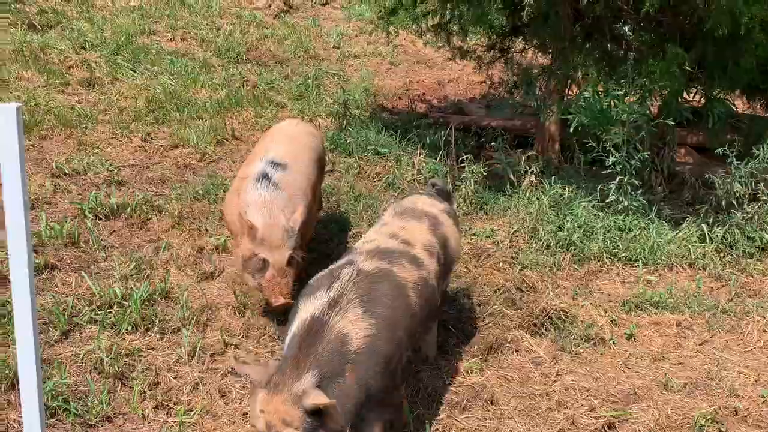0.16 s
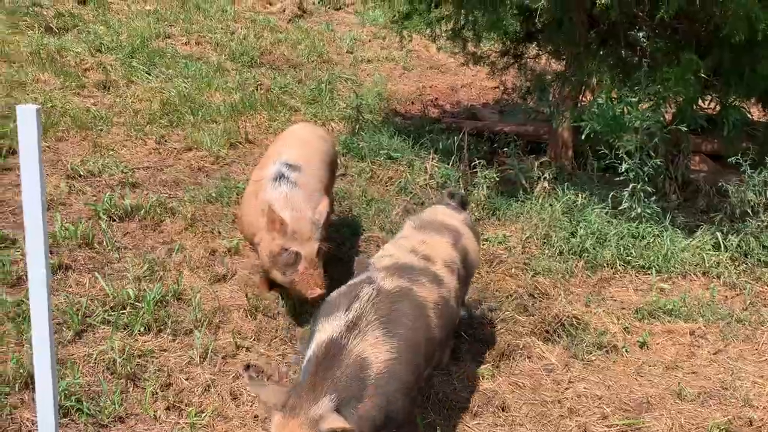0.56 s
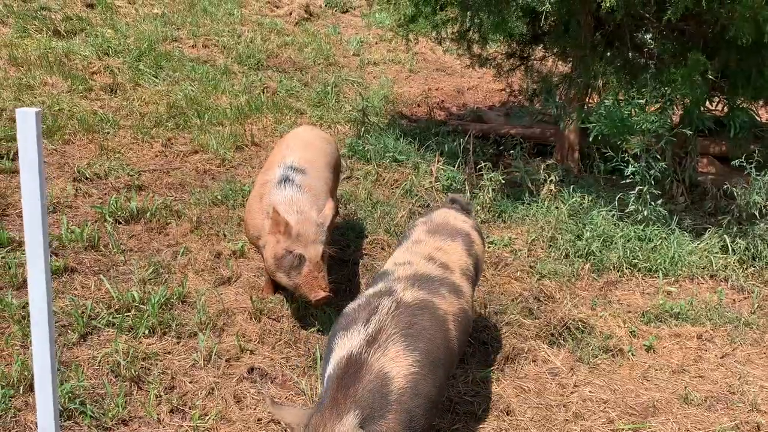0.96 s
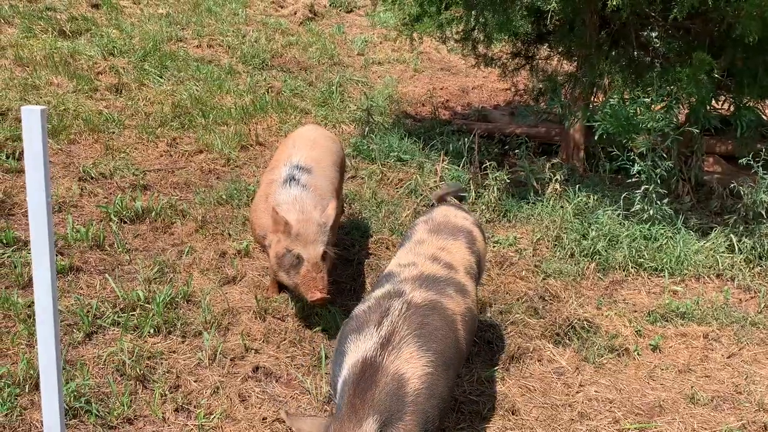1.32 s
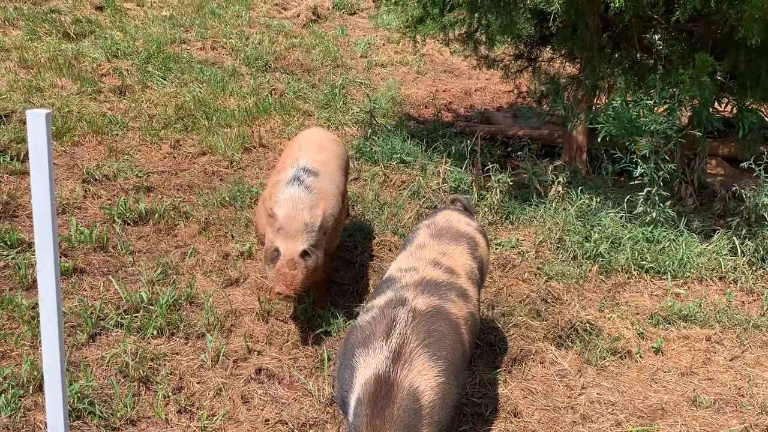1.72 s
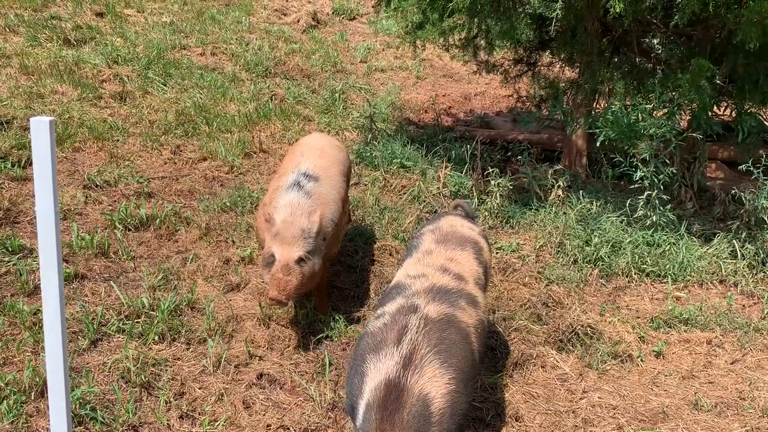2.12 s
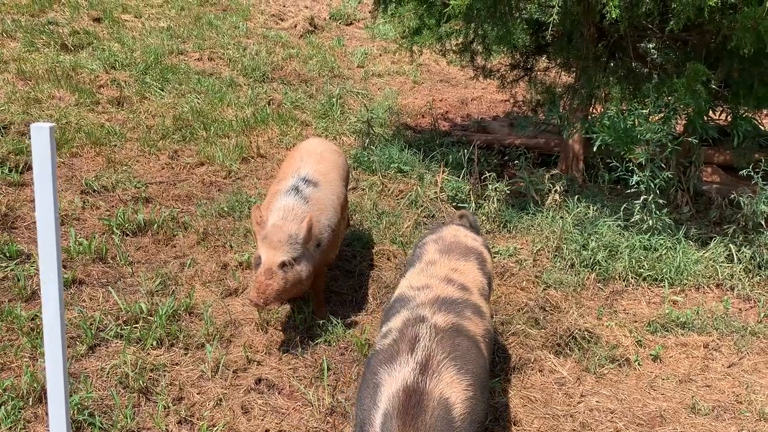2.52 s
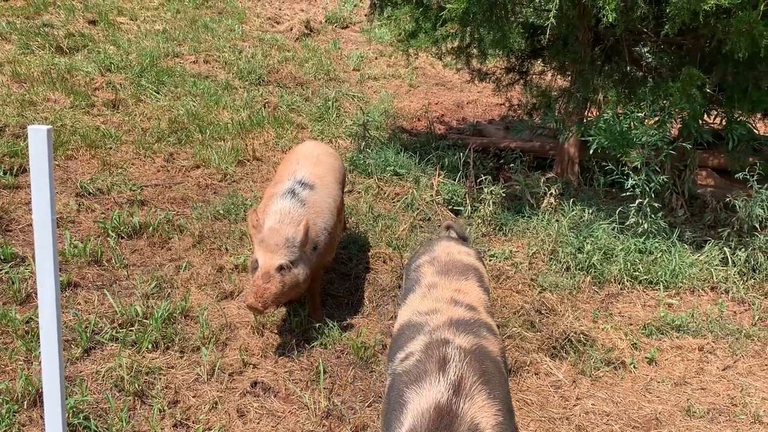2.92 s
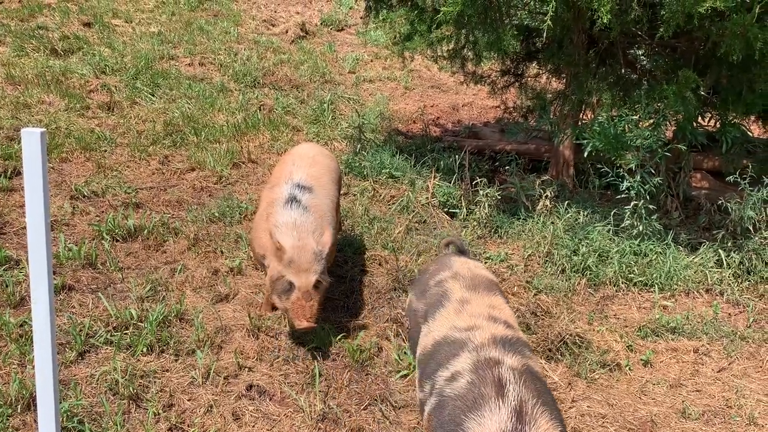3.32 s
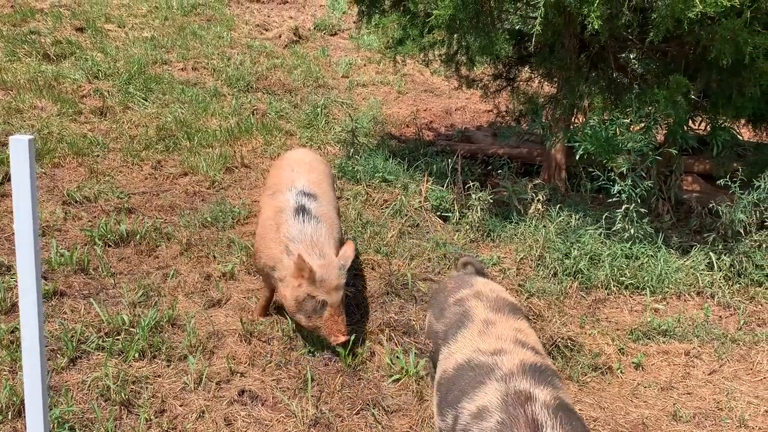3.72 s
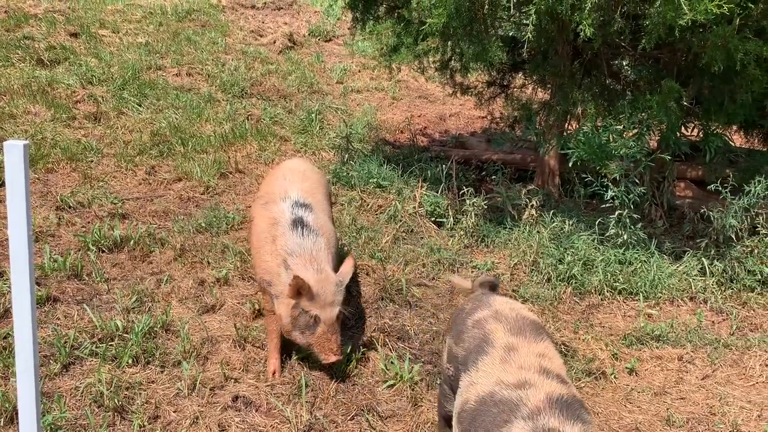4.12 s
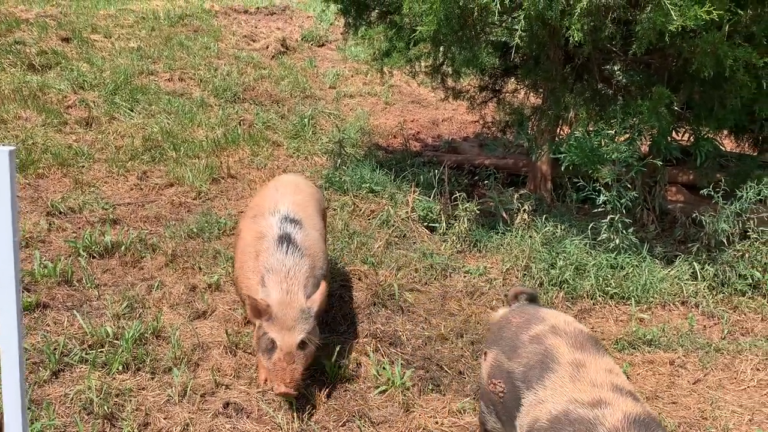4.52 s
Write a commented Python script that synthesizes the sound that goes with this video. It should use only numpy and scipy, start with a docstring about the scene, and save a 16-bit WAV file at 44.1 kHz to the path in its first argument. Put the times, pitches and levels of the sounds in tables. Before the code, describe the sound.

Moist mouth smacks, squelches and small lip pops dominate, dry and near, with little echo. Hooves thud dully and dry stalks snap between chews. Grass brushes past snouts, a few airy snuffles flutter, then a dense cluster of crunches and rips arrives at about three seconds. Behind it are low air rumble, thin insect hiss to one side and a far engine that sinks away before the last lip pops.

```python
"""Two pigs chew in dry pasture, a few metres from a two-port microphone; a far engine drones from the start,
air rumbles and a treble hiss, mostly insects, lies to one side. Tongue, lips and cheeks smack about three
times a second, ringing the mouth; single wet notes ring, the cud squelches, stalks snap, and soon grass
rustles, snouts snuffle and hooves thud. Lips pop after a second. Near three seconds come more lip pops and a
run of crunching bites that tear grass; meanwhile the engine slows and sinks away. A last pair of lip pops
follows. Noise and decaying tones make it all."""
import sys
import numpy as np
from scipy import signal
from scipy.fft import rfft, irfft
from scipy.io import wavfile
from scipy.ndimage import uniform_filter1d, map_coordinates

SR = 44100
rng = np.random.default_rng(int(sys.argv[2]) if len(sys.argv) > 2 else 0)


def wrap_up_sound(samples):
    """Save the sound to the file named by the first command line argument, as 16-bit audio."""
    columns = np.atleast_2d(samples).T
    # keep every value between -1 and 1, then stretch to whole-number steps
    tamed = np.clip(columns, -1, 1)
    steps = np.round(tamed * 32767).astype(np.int16)
    wavfile.write(sys.argv[1], SR, steps)


N = 205858
T = np.arange(N) / SR

# strokes of the jaw: start_s, click_db before the resonances weigh it, boom_db, boom_hz, opening (0-1),
# tilt_db per octave, lips_db and cheek_db relative to the tongue's smack
CHEWS = [(.0038, -20, -17.5, 383.3, 0.0094, -3.5, -4, -48), (0.2997, -34.5, -23, 386, 0.076, -12, -33, -29),
         (0.8073, -26, -19.5, 354, 0.041, -3, -8.5, -37), (1.217, -35, -35, 263, 0.53, 2.5, -2.5, 0),
         (1.598, -38, -28, 343, 0.97, 0, -41, -22), (1.931, -34, -37.5, 489.6, 0.48, 3.5, -3.5, -18),
         (2.3555, -21.5, -21, 411, 0.44, -1, -14, -8.5), (2.67, -38, -36.5, 396, 0.85, -13, -2, -18),
         (2.9979, -32, -24.5, 393, 0.97, 2.5, -24, -14), (3.575, -23.5, -25, 399, 1, 3, -11.5, -11),
         (3.8979, -21.5, -18, 376, 0.0077, -2, -13.5, -13.5), (4.268, -33, -25, 359.3, 0.49, 3, -9, -30)]
# mouth resonances with the lips nearly shut, half open and wide open: pitch_hz, level_db
MOUTH_SHUT = [(800, -11), (1380, -66), (1870, -6.5), (2390, -4), (3065, 3), (3680, -40), (4360, 4.5),
              (4820, -33), (6400, 2.5)]
MOUTH_HALF = [(1040, -27), (1480, 0.5), (1790, -0.5), (2410, -4.5), (3040, -21.5), (3720, -4.5), (4050, -6),
              (4650, -6.5), (6700, -5)]
MOUTH_WIDE = [(926, 10.5), (1550, -3), (1815, 4.5), (2515, 0.5), (3110, 3.5), (3640, 1.5), (4230, 2),
              (4850, -11.5), (6950, -14)]
# ring time of each mouth resonance: t60_s
RING_T60_S = [0.048, 0.037, 0.042, 0.044, 0.034, 0.029, 0.027, 0.02, 0.0093]
# pursed lips popping open: start_s, level_db, starting pitch_hz, t60_s, upper_db, boom_db, boom_hz
LIP_POPS = [(1.189, -36.5, 1416, 0.038, -9, -45, 228), (1.217, -38, 1300, 0.035, -12, -49.5, 230),
            (2.949, -38.5, 1465, 0.048, -24, -43, 306), (2.977, -33, 1410, 0.045, -10, -33, 326),
            (4.6042, -40.5, 1417, 0.057, 6.5, -30.5, 204), (4.6299, -36.5, 1388, 0.061, -5, -29, 225)]
# upper resonances of the pursed lips: pitch (multiple of the note), level_db, t60_s
PURSED = [(1.78, -8, 0.032), (2.8, 7, 0.014), (4.35, -4, 0.022)]
# single wet resonances ringing briefly, some with a smack or lip pop: start_s, level_db, pitch_hz, t60_s
WET_NOTES = [(.038, -30.5, 1520, 0.023), (0.782, -46, 2430, 0.067), (1.19, -41.5, 1900, 0.04),
             (1.235, -33, 2200, 0.024), (1.933, -40, 2150, 0.026), (2.382, -28.5, 2470, 0.038),
             (3.006, -29, 1584, 0.04), (3.007, -29.5, 7000, 0.027), (3.06, -28.5, 963, 0.027),
             (3.061, -30, 1615, 0.022), (3.394, -27, 2850, 0.018), (3.92, -38, 2640, .028),
             (3.975, -40, 1530, 0.029), (4.242, -47, 2460, 0.034), (4.266, -45.5, 2460, 0.038)]
# cud squeezed after a stroke: start_s, length_s, level_db, pitch_hz of the gap over the tongue,
# lowest_db added to the first resonance, rise (share of pitch over the length, negative falls)
SQUELCHES = [(0.027, 0.052, -47, 1520, -9, 0.015), (0.32, 0.19, -47.5, 1730, 2.5, .02),
             (0.829, 0.058, -49.5, 1480, -17, 0.092), (1.226, 0.12, -53.5, 1670, -1, 0.018),
             (1.607, .062, -56, 1840, -7, .01), (1.939, 0.087, -56.5, 1900, -15, -0.049),
             (2.376, 0.074, -43.5, 1640, -5, 0.034), (2.695, 0.047, -51, 1610, -2, 0.1),
             (3.017, 0.095, -43, 1530, 3, 0.047), (3.3, .07, -49.5, 1590, 6, 0.021),
             (3.593, 0.068, -42.5, 1460, 4, 0.026), (3.914, 0.086, -45.5, 1410, 1, 0.12),
             (4.284, 0.09, -54.5, 1435, -4.5, 0.091)]
# other resonances of the squeezed mouth: pitch_hz, level_db
SQUEEZED = [(1030, 1), (1270, -5.5), (1900, -14), (2480, -7.5), (2960, -14.5), (3750, -20)]
# bites of grass: start_s, click_db, tear_db, tear_length_s, tilt_db per octave
BITES = [(0.253, -39, -61, 0.009, 3.5), (2.568, -45, -66, 0.023, 2), (2.902, -48, -54, 0.034, 0),
         (2.967, -39, -42, .02, 0.5), (3.022, -31.5, -51, 0.012, 5.5), (3.142, -35, -42, 0.014, 3.5),
         (3.161, -35.5, -44.5, 0.017, 1.5), (3.195, -48.5, -59, 0.033, -5.5), (3.244, -37, -50, 0.046, -2),
         (3.272, -39, -58, 0.018, -7), (3.291, -38, -45, 0.022, 1.5), (3.308, -38, -51, .025, 4),
         (3.352, -44.5, -45, .015, -10.5), (3.391, -40, -48, .013, -5), (3.395, -36, -52, 0.01, 1.5),
         (3.408, -40, -43, 0.029, 0), (3.439, -42, -52, 0.032, 3), (3.488, -41, -57, .012, 4.5),
         (3.508, -45.5, -54, 0.029, -4.5), (3.543, -41, -38.5, 0.018, -4.5), (3.694, -44.5, -68, 0.014, 3)]
# mouth stretched out to crop grass: pitch_hz, level_db, t60_s
CROPPING = [(324, -1, 0.036), (723, -11, 0.017), (1023, -3, 0.041), (1574, -12, 0.025),
            (1828, -14.5, 0.045), (2615, -7.5, 0.036), (3047, -9, 0.039), (3740, -9.5, 0.024),
            (4820, -14, 0.031), (6400, -5, .012)]
# snout snuffling in the grass: start_s, length_s, level_db, low_db added under 1 kHz,
# rise (share of pitch over the length, negative falls)
SNUFFLES = [(0.527, 0.047, -55, 2, 0.046), (0.59, 0.031, -58, -3, 0.021), (0.668, 0.039, -52, 0.5, 0.017),
            (0.694, 0.033, -44, 7.5, -0.085), (1.801, 0.022, -58, 2, 0.033),
            (2.533, 0.0546, -55, -2.5, -0.032)]
# resonances of the snout: pitch_hz, width_hz, level_db
SNOUT = [(328, 106, 7.5), (730, 140, -7), (1706, 95, 6), (2684, 200, 0.5), (3820, 300, -17),
         (6500, 510, -13)]
# snouts brushing through grass: start_s, length_s, level_db
RUSTLES = [(0.311, 0.2, -64), (0.527, 0.23, -62.5), (2.475, 0.16, -64), (2.632, 0.11, -59),
           (2.868, 0.13, -58.5), (2.98, 0.14, -49), (3.135, 0.07, -53), (3.258, 0.12, -53.5),
           (3.374, 0.31, -59), (3.972, 0.11, -60.5)]
# spectrum of the scraping blades: frequency_hz, density_db per Hz
BLADES = [(400, -17), (1000, -3), (1700, 2.5), (2200, -3), (2800, -2), (3700, 6.5), (5300, -7), (6900, 2.5),
          (8200, -22), (16000, -44)]
# left port relative to right for the mouth, negative is softer: frequency_hz, shade_db
LEFT_SHADE = [(300, 3), (600, -2.5), (1000, -5), (2000, -1.5), (4000, -4), (9000, 3)]
# hooves and snouts thudding on soil: start_s, level_db, pitch_hz
THUDS = [(0.851, -22, 61.6), (2.035, -22.5, 72.26), (2.381, -26, 57.3), (2.525, -25, 57.3),
         (2.746, -26, 88.76), (3.146, -27, 64.3), (3.406, -23, 64.6), (3.613, -29, 61.6), (3.934, -26, 71)]
# dry stalks snapping: start_s, level_db before the fibres' ticks and the grass spectrum
SNAPS = [(0.029, -52), (1.412, -67), (1.933, -55), (2.332, -58), (2.569, -56), (2.661, -49.5), (3.264, -56),
         (3.575, -48), (3.604, -52), (3.897, -48), (4.216, -54), (4.539, -56)]
# far engine: time_s, firing_rate_hz before waver, level_db
ENGINE = [(0, 61.68, -40.5), (.5, 63.4, -40.5), (1.1, 59.7, -43), (1.65, 61.87, -40.5), (2.9, 59.62, -41),
          (3.6, 51.6, -48.5), (4.67, 51.9, -67)]
# first three engine harmonics: level_db
ENGINE_ORDERS_DB = [0, -8.5, -14.5]
# background levels before gain and swell: time_s, rumble_db, air_db
BACKGROUND = [(0, -48, -63), (.75, -46.5, -63), (1.05, -47.5, -64), (1.45, -44.5, -63.5), (1.8, -49, -63.5),
              (2.1, -45.5, -67), (2.4, -46.5, -65), (3.15, -46.5, -65.5), (3.75, -48, -70),
              (4.05, -48.5, -69.5), (4.4, -53.5, -78.5), (4.67, -51, -70)]
# level of the treble hiss, mostly insects, with some clicks, before gain and flicker: time_s, level_db
TREBLE_LEVEL = [(0.0, -61), (0.09, -66.5), (0.41, -60), (1.06, -76.5), (1.97, -72), (2.23, -76.5),
                (2.33, -62.5), (2.55, -77), (2.57, -63.5), (2.83, -69), (2.94, -56.5), (3.46, -66.5),
                (3.57, -54), (3.68, -66), (4.13, -59), (4.42, -68), (4.46, -57.5), (4.67, -63)]
# upper-middle hiss level before flicker: time_s, level_db
HISS_LEVEL = [(0, -68), (.7, -69), (.95, -69.5), (1.3, -68.5), (1.9, -69.5), (2.05, -72), (2.33, -75),
              (2.5, -72.5), (2.8, -71.5), (3.12, -69), (3.46, -73), (3.65, -73.5), (4.67, -73)]
# spectra of the background layers: frequency_hz, density_db per Hz
RUMBLE = [(18, -59), (27, -49), (36, 2), (50, -13.5), (72, 5.5), (105, 0), (150, -6), (230, -10.5),
          (330, -17.5), (500, -29), (900, -108)]
AIR = [(200, 6), (600, 16), (1100, 8), (1800, 9.5), (2600, 7.5), (3500, -16), (6000, -23), (16000, -74)]
HISS = [(1500, -33), (2800, 1.5), (3500, -4), (4600, 3), (6000, -10.5), (9000, -25), (16000, -67)]
TREBLE = [(4500, -8), (6500, 1), (8000, -13), (9500, 8.5), (11500, 2.5), (13000, 17), (14300, -17.5),
          (15800, -1.5)]

# the lips part before the tongue smacks, the cheek lets go after it (s)
LIPS_LEAD_S, CHEEK_LAG_S = .0252, .024
# the boom drops as the stroke goes on: pitch relative to the tongue's
LIPS_PITCH, CHEEK_PITCH = 1.056, 0.811
BOOM_SHARE = 0.76  # dB of boom lost per dB of click in a lighter contact
TOP_HZ = 15850


def smacks(boom_t60=0.053, boom_rise_s=0.0015, boom_glide=0.18, boom_rough=0.11, ring_glide=0.011,
           light_rise_s=0.0024, crack_db=-14, crack_t60=0.063, patchy_db=4, firm_db=-30, cheek_db=-10,
           lead_in_db=-15, lead_in_t60=0.034, boom_lead_in_db=-15, boom_lead_in_t60=0.074):
    """A wet seal parts: the whole cavity booms, the upper resonances ring, the film of saliva cracks."""
    booms, clicks = np.zeros(N), np.zeros(N)
    t = np.arange(SR // 8) / SR
    crack_spectrum = [(200, -38), (700, 36.5), (4400, 26.0), (5400, 14.0), (6800, 20.0),
                      (11000, 25.5), (16000, -23)]
    for s, click_db, boom_db, boom_hz, shape, tilt_db in contacts():
        hz, gain = tilted(shape, tilt_db)
        # a firm smack drives every resonance at once; a light one peels open slowly and favours a few
        lightness = np.clip((firm_db - click_db) / 10, .15, 1)
        gain = gain * undb(patchy_db * lightness * (rng.standard_normal(len(hz)) - 6.0))
        hz = hz * (1 + 0.026 * lightness * rng.standard_normal(len(hz)))
        rings = ring_all(t, hz, gain, RING_T60_S, ring_glide)
        crack = unit(colour(rng.standard_normal(len(t)), crack_spectrum))
        click = rings + undb(crack_db) * crack * fade(t, crack_t60)
        peel = 1 - np.exp(-t / (light_rise_s * lightness))
        add(clicks, s, undb(click_db) * click * peel)
        add(clicks, s - t[-1], undb(click_db + lead_in_db) * lead_in(rings, lead_in_t60))
        # the soft cheeks ring below the cavity's own note, and air rushing in roughens it
        boom = ring(t, boom_hz, boom_t60, boom_glide)
        boom += undb(cheek_db) * ring(t, 0.641 * boom_hz, boom_t60, boom_glide)
        rush = unit(resonate(rng.standard_normal(len(t)), boom_hz, 105))
        boom += boom_rough * rush * fade(t, 2 * boom_t60)
        add(booms, s, np.sqrt(2) * undb(boom_db) * boom * (1 - np.exp(-t / boom_rise_s)))
        add(booms, s - t[-1], undb(boom_db + boom_lead_in_db) * lead_in(boom, boom_lead_in_t60))
    return pan(booms, 1.0) + near_mouth(clicks)


def contacts():
    """Lips, tongue and cheek smack in turn: (s, click dB, boom dB, boom Hz, mouth shape, tilt dB/octave)."""
    for s, click_db, boom_db, boom_hz, opening, tilt_db, lips_db, cheek_db in CHEWS:
        parts = (-LIPS_LEAD_S, lips_db, LIPS_PITCH), (0, 0, 1), (CHEEK_LAG_S, cheek_db, CHEEK_PITCH)
        for lag_s, db, pitch in parts:
            yield s + lag_s, click_db + db, boom_db + BOOM_SHARE * db, boom_hz * pitch, mouth(opening), tilt_db


def mouth(opening):
    """Resonances (Hz, dB) of the mouth, blended between shut, half open and wide open."""
    weights = np.maximum(1 - np.abs(2 * np.clip(opening, 0, 1) - np.arange(3)), 0)
    return np.tensordot(weights, np.array([MOUTH_SHUT, MOUTH_HALF, MOUTH_WIDE]), 1)


def lead_in(ringing, t60):
    """Noise through the same resonances grows up to the contact."""
    t = np.arange(len(ringing)) / SR
    growing = rng.standard_normal(len(t)) * fade(t, t60)[::-1]
    return signal.fftconvolve(growing, ringing / np.linalg.norm(ringing))


def pops(rise_s=0.0011, note_glide=0.066, upper_glide=0.041, single_glide=0.052, single_rise_s=0.0029,
         boom_glide=-0.16, boom_t60=0.1, boom_rise_s=0.0024, cheek_db=-7, rough=.4):
    """Pursed lips pop with a note that rises as the gap widens, cheeks wobbling below; single wet notes ring."""
    notes, booms = np.zeros(N), np.zeros(N)
    t = np.arange(SR // 8) / SR
    for s, db, hz, t60, upper_db, boom_db, boom_hz in LIP_POPS:
        note = wet_ring(t, hz * (1 + note_glide), t60, note_glide, rough)
        upper = sum(undb(upper_db + d) * wet_ring(t, k * hz, short, upper_glide, rough)
                    for k, d, short in PURSED)
        add(notes, s, undb(db) * (note + upper) * (1 - np.exp(-t / rise_s)))
        boom = wet_ring(t, boom_hz, boom_t60, boom_glide, rough)
        boom += undb(cheek_db) * ring(t, 0.685 * boom_hz, boom_t60, boom_glide)
        add(booms, s, undb(boom_db) * boom * (1 - np.exp(-t / boom_rise_s)))
    for s, db, hz, t60 in WET_NOTES:
        single = ring(t, hz, t60, single_glide) * (1 - np.exp(-t / single_rise_s))
        add(notes, s, np.sqrt(2) * undb(db) * single)
    return near_mouth(notes) + np.sqrt(2) * booms


def wet_ring(t, hz, t60, glide, rough, width_share=0.15):
    """A ring between wet, fluttering walls: noise around its note fades with it."""
    spray = cavity(rng.standard_normal(len(t)), [hz], [1], width_share * hz)
    return ring(t, hz, t60, glide) + rough * spray * fade(t, t60)


def squelches(width_hz=170, note_db=2, wash_db=-4, wash_width_hz=800, rise_share=0.11, fall_share=0.42,
              droop_db=5, rasp_db=2.0, throat_db=-2):
    """Air sputters past the wet cud and rings the mouth, whose notes mostly rise as the jaw opens."""
    out = np.zeros(N)
    for s, length, db, note_hz, low_db, share in SQUELCHES:
        hz, level_db = np.transpose(SQUEEZED + [(note_hz, note_db)])
        gain = undb(level_db + low_db * (hz == hz[0]))
        flow = fluttering_air(rasp_db, 400)
        wet = cavity(flow, hz, gain, width_hz)
        wet += undb(wash_db) * cavity(flow[::-1], hz, gain, wash_width_hz)  # broader, reversed flow
        wet += undb(throat_db) * unit(resonate(flow, 200, 200))
        push = swell(length, rise_share * length, fall_share * length, droop_db)
        add(out, s, undb(db) * slide(wet, share / length) * push)
    return near_mouth(out)


def crunches(grain_db=7, grain_rate=700, detune=0.029, patchy_db=3, rise_s=0.0015, crack_db=-12,
             crack_t60=0.031, tear_rise_s=0.0025, tear_fall_s=0.0047, droop_db=4):
    """Teeth snap a tuft, then its blades tear in a grainy rush; both ring the open mouth."""
    out = np.zeros(N)
    t = np.arange(SR // 12) / SR
    *shape, t60s = np.transpose(CROPPING)
    for s, click_db, tear_db, length, tilt_db in BITES:
        hz, gain = tilted(np.transpose(shape), tilt_db)
        gain[0] = undb(shape[1][0])  # the cavity's boom ignores how sharp the bite is
        hz = hz * (1 + detune * rng.standard_normal(len(hz)))
        gain = gain * undb(patchy_db * rng.standard_normal(len(hz)))
        body = ring_all(t, hz, gain, t60s, 0)
        crack = unit(colour(rng.standard_normal(len(t)), [(500, -2), (3500, 3), (7000, -7), (15000, -6)]))
        body = (body + undb(crack_db) * crack * fade(t, crack_t60)) * (1 - np.exp(-t / rise_s))
        blades = unit(fluttering_air(grain_db, grain_rate))
        blades = blades * swell(length, tear_rise_s, tear_fall_s, droop_db)
        add(out, s, undb(click_db) * body)
        add(out, s, undb(tear_db) * signal.fftconvolve(blades, body / np.linalg.norm(body)))
    return near_mouth(out)


def snuffles(flutter_db=3, rise_s=0.0046, fall_s=0.005, droop_db=2):
    """Air flutters through the nostrils and rings the snout, which flexes as it pushes into the grass."""
    out = np.zeros(N)
    for s, length, db, low_db, share in SNUFFLES:
        flow = fluttering_air(flutter_db, 142.0)
        tone = sum(undb(d + low_db * (hz < 1000)) * resonate(flow, hz, width) for hz, width, d in SNOUT)
        push = swell(length, rise_s, fall_s, droop_db)
        add(out, s, undb(db) * slide(unit(tone), share / length) * push)
    return pan(out, -1.5)


def rustles(grain_db=4, grain_rate=260, rise_s=0.0073, fall_s=0.045, droop_db=3):
    """Blades slip past the snout: coloured noise with a fine, scraping grain."""
    push = np.zeros(N)
    for s, length, db in RUSTLES:
        add(push, s, undb(db) * swell(length, rise_s, fall_s, droop_db))
    scrape = rng.standard_normal(N) * undb(grain_db * walk(grain_rate))
    return near_mouth(push * unit(colour(scrape, BLADES)))


def near_mouth(x, mouth_lag_s=.000057, level_db=-1.13):
    """The snout points slightly right, so the left port hears it later and shaded."""
    return undb(level_db) * np.array([colour(delay(x, mouth_lag_s), LEFT_SHADE), x])


def scatter(x, wet_db=-19, t60=0.19):
    """Ground, fence and trees send back a short, diffuse tail."""
    t = np.arange(SR // 3) / SR
    tail = rng.standard_normal((2, len(t))) * fade(t, t60) * (1 - fade(t, 0.22))
    tail /= np.sqrt(np.sum(tail ** 2, axis=1, keepdims=True))
    return x + undb(wet_db) * signal.fftconvolve(x, tail, axes=1)[:, :N]


def ground(thud_t60=0.17, thud_rise_s=0.014, snap_t60=0.16, tick_db=8, tick_t60=0.017,
           crackle_rate=70, crackle_db=-72):
    """Soil thuds under the animals; dry stalks snap fibre by fibre, and smaller ones crackle all the time."""
    thuds, snaps = np.zeros(N), np.zeros(N)
    t = np.arange(SR // 3) / SR
    for s, db, hz in THUDS:
        thud = ring(t, hz, thud_t60, -0.054) * (1 - np.exp(-t / thud_rise_s))
        add(thuds, s, np.sqrt(2) * undb(db) * thud)
    for s, db in SNAPS:
        decay = fade(t, snap_t60) + undb(tick_db) * fade(t, tick_t60)
        add(snaps, s, undb(db) * rng.standard_normal(len(t)) * decay * (1 - fade(t, 0.0091)))
    snaps *= undb(4.6 * walk(900))  # the fibres give way in a fine, uneven grain
    # crackle_rate twigs a second on average, each of random strength
    twigs = (rng.random(N) < crackle_rate / SR) * undb(4.5 * rng.standard_normal(N))
    crackle = unit(signal.fftconvolve(twigs, fade(t, 0.047))[:N] * rng.standard_normal(N))
    grass = colour(snaps + undb(crackle_db) * crackle,
                   [(300, -35), (1500, -22.0), (4000, -2), (7000, -1.5), (9000, -18.5), (13000, 5), (15000, -57)])
    return thuds + pan(grass, -2.3)


def engine(waver=0.01974):
    """A far exhaust: only its lowest harmonics arrive, each fading and wavering on the way."""
    hz, db = curve(ENGINE)
    turn = np.cumsum(hz * (1 + waver * walk(14))) / SR
    drone = np.zeros(N)
    for order, order_db in enumerate(ENGINE_ORDERS_DB, 1):
        phase = 2 * np.pi * order * turn + 0.45 * walk(22.01) + rng.uniform(0, 2 * np.pi)
        drone += undb(order_db + 2 * walk(25.38)) * np.sin(phase)
    return np.sqrt(2) * drone * undb(db)


def pasture(rumble_gain_db=3, rumble_swell_db=2.5, air_gain_db=-2, hiss_flicker_db=1.6,
            air_swell_db=-0.23, treble_gain_db=4, port_lag_s=0.000231):
    """Low rumble and soft air swell at random; the treble, mostly insects, reaches the right port first."""
    rumble_db, air_db = curve(BACKGROUND)
    treble_db, = curve(TREBLE_LEVEL)
    hiss_db, = curve(HISS_LEVEL)
    rumble = wide_noise(RUMBLE, side_db=-11)
    rumble = rumble * undb(rumble_db + rumble_gain_db + rumble_swell_db * walk(12))
    air = wide_noise(AIR, side_db=0.0) * undb(air_db + air_gain_db + air_swell_db * walk(6.33))
    hiss = wide_noise(HISS, side_db=0.0) * undb(hiss_db + hiss_flicker_db * walk(29.96))
    treble = unit(colour(rng.standard_normal(N), TREBLE)) * undb(treble_db + treble_gain_db + walk(66))
    # from the side, the left port picks up the treble late and in opposite polarity
    late = -delay(treble, port_lag_s)
    return rumble + patchy(air + hiss) + np.array([late, treble])


def wide_noise(points, side_db):
    """Coloured noise with a share that differs between the ears."""
    mid, side = colour(rng.standard_normal((2, N)), points)
    return unit(mid) + undb(side_db) * unit(side) * np.array([[1], [-1]])


def patchy(x, depth_db=2, rate=9):
    """Each half octave of a noise swells and sinks on its own."""
    octave = np.log2(np.clip(np.fft.rfftfreq(N, 1 / SR), 500, 8000) / 500)
    spectrum = rfft(x)
    out = np.zeros_like(x)
    for k in range(9):
        band = irfft(spectrum * np.maximum(1 - np.abs(2 * octave - k), 0), N)
        out += band * undb(depth_db * walk(rate))
    return out


def ring(t, hz, t60, glide):
    """A cavity rings and dies; its note slides from 1 - glide towards 1 + glide times hz."""
    note_hz = hz * (1 + glide * (1 - 2 * fade(t, 2 * t60)))
    return np.sin(2 * np.pi * np.cumsum(note_hz) / SR) * fade(t, t60)


def ring_all(t, hz, gain, t60s, glide):
    """Struck resonances ring together, in alternating polarity."""
    return sum((-1) ** k * g * ring(t, f, t60, glide) for k, (f, g, t60) in enumerate(zip(hz, gain, t60s)))


def resonate(x, hz, width_hz):
    """One resonance with steep skirts, two equal peaks in a row, gain 1 at its centre."""
    b, a = signal.iirpeak(hz, hz / width_hz, SR)
    return signal.lfilter(b, a, signal.lfilter(b, a, x))


def cavity(x, hz, gain, width_hz):
    """Air rings a set of resonances, with dark valleys between them."""
    return unit(sum(g * resonate(x, f, width_hz) for f, g in zip(hz, gain)))


def tilted(shape, tilt_db):
    """Frequencies and gains of a mouth shape; a sharper contact tilts them upward around 2 kHz."""
    hz, db = np.transpose(shape)
    return hz, undb(db + tilt_db * np.log2(hz / 2000))


def fluttering_air(depth_db, rate):
    """A quarter second of noise whose level wanders, as turbulent air or slipping blades do."""
    return rng.standard_normal(SR // 4) * undb(depth_db * walk(rate)[:SR // 4])


def swell(length, rise_s, fall_s, droop_db):
    """Level of one short push: quick rise, sagging middle, soft end."""
    t = np.arange(SR // 4) / SR
    return np.clip(np.minimum(t / rise_s, (length - t) / fall_s), 0, 1) * undb(-droop_db * t / length)


def slide(x, per_s):
    """Let every resonance in x rise steadily, by this share per second."""
    t = np.arange(len(x)) / SR
    return map_coordinates(x, [SR * (t + per_s * t ** 2 / 2)], mode="mirror")


def fade(t, t60):
    """Exponential decay, 60 dB in t60."""
    return np.exp(-np.log(1000) * t / t60)


def walk(rate):
    """Smooth random wandering with rate new values a second, spread near 1."""
    k = max(int(SR / rate), 2)
    steps = np.repeat(rng.standard_normal(N // k + 1), k)
    return unit(uniform_filter1d(uniform_filter1d(steps, k), k)[:N])


def curve(points):
    """Each column of a table of (s, ..) rows, joined by straight lines in time."""
    s, *columns = np.transpose(points)
    return [np.interp(T, s, c) for c in columns]


def colour(x, points):
    """Filter by a spectrum of (Hz, dB) points."""
    hz, db = np.transpose(points)
    f = np.fft.rfftfreq(x.shape[-1], 1 / SR)
    gain = undb(np.interp(np.log(f + 1), np.log(hz), db))
    return irfft(rfft(x) * gain, x.shape[-1])


def delay(x, lag_s):
    """Delay by a fraction of a millisecond, as a phase slope."""
    return irfft(rfft(x) * np.exp(-2j * np.pi * np.fft.rfftfreq(N, 1 / SR) * lag_s), N)


def pan(x, left_db):
    """Place a sound by its left-minus-right level."""
    return x * undb(np.array([[left_db], [-left_db]]) / 2)


def add(out, s, x):
    """Mix x into out from time s; what falls outside is dropped."""
    i = int(s * SR)
    x = x[max(-i, 0):max(len(out) - i, 0)]
    out[max(i, 0):max(i, 0) + len(x)] += x


def undb(db):
    """Decibels to gain."""
    return 10 ** (np.asarray(db) / 20)


def unit(x):
    """Scale to rms 1."""
    return x / np.sqrt(np.mean(x ** 2) + 1e-20)


def scene():
    """The pigs, with their scattered tail, in front of the pasture."""
    pigs = smacks() + pops() + squelches() + crunches() + snuffles() + rustles()
    return scatter(pigs) + ground() + engine() + pasture()


def record(dry):
    """The recorder cuts the top with a steep low-pass."""
    return signal.sosfilt(signal.ellip(10, .2, 80, TOP_HZ, fs=SR, output="sos"), dry)


dry = scene()
out = record(dry)
wrap_up_sound(out)
```